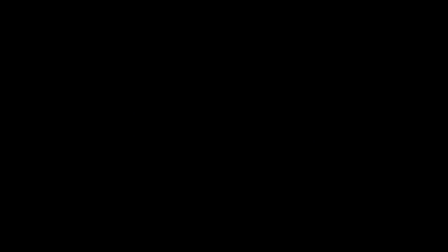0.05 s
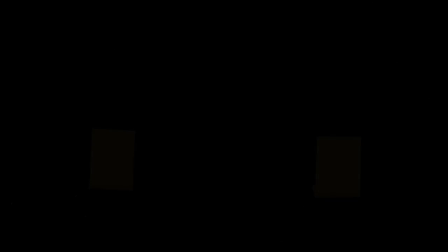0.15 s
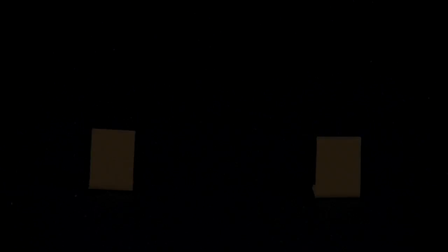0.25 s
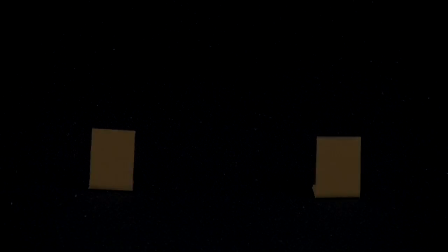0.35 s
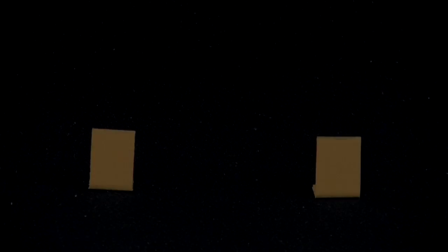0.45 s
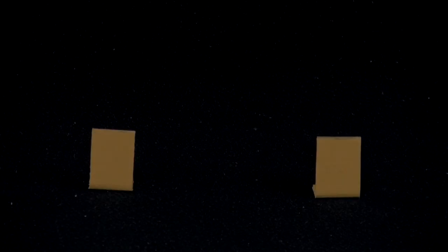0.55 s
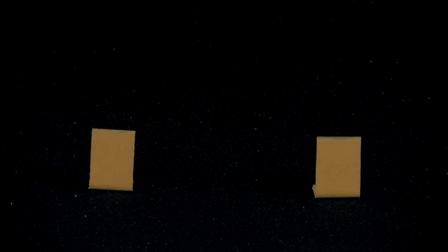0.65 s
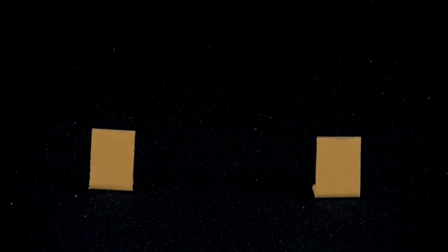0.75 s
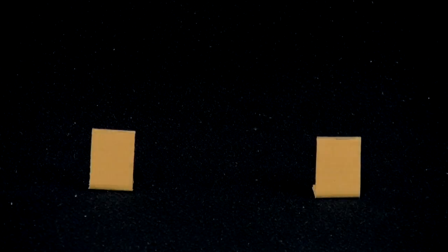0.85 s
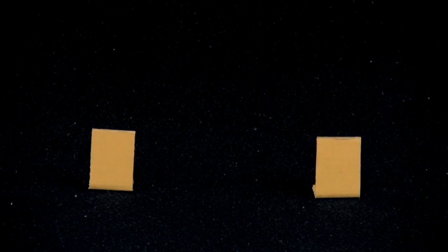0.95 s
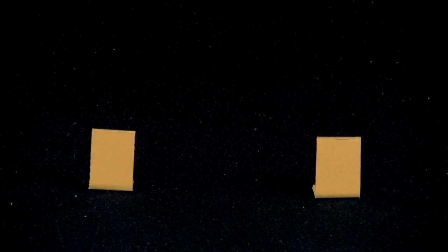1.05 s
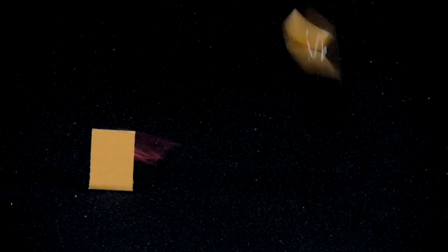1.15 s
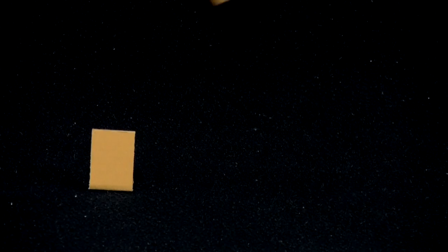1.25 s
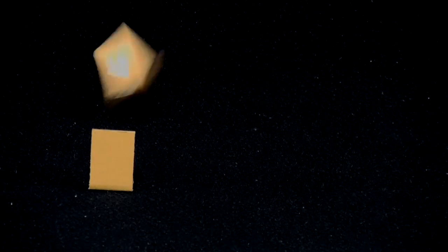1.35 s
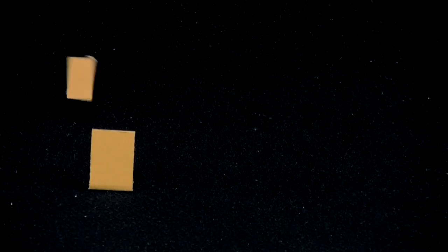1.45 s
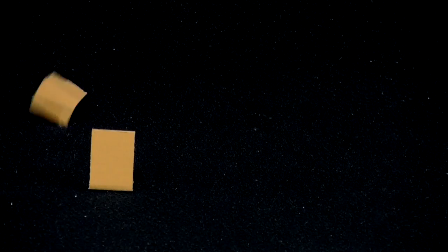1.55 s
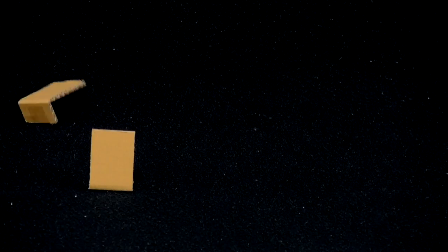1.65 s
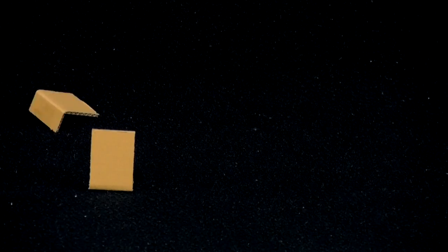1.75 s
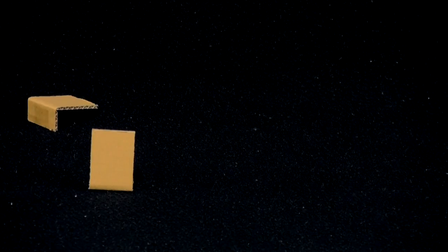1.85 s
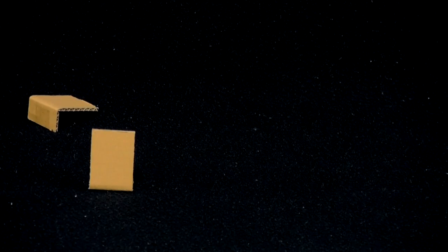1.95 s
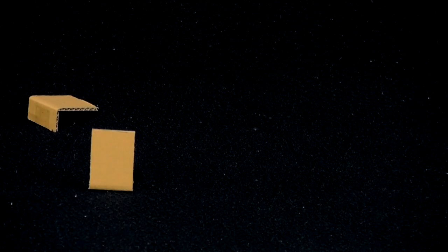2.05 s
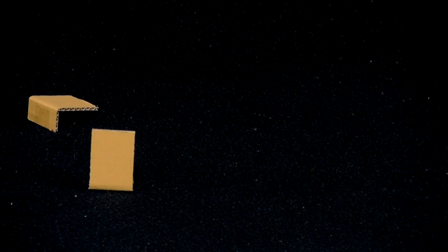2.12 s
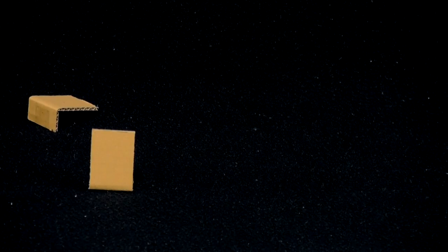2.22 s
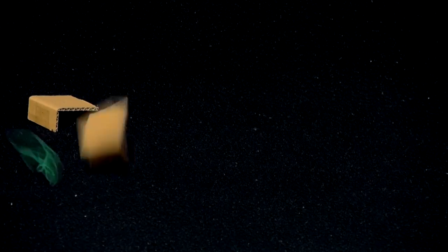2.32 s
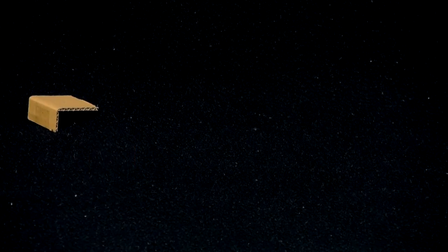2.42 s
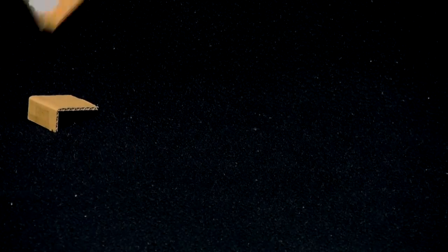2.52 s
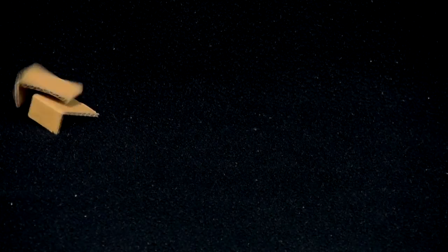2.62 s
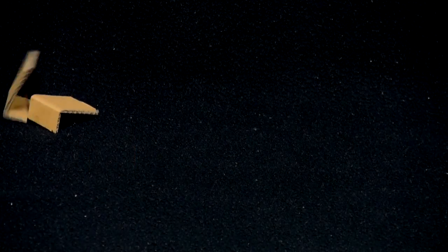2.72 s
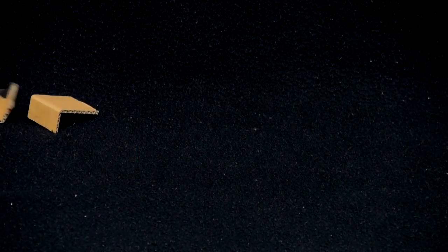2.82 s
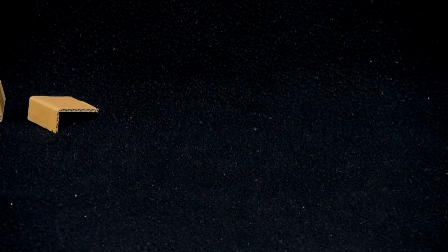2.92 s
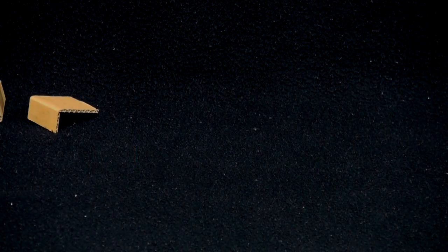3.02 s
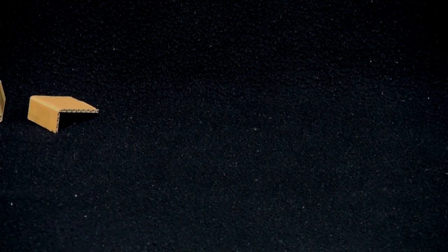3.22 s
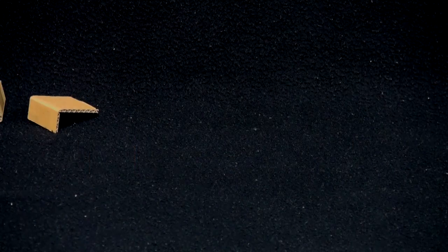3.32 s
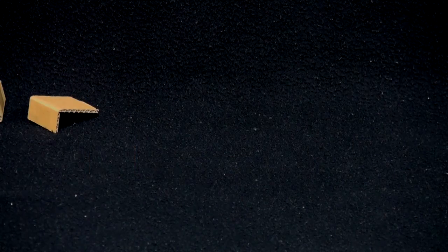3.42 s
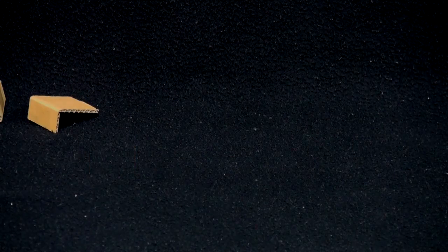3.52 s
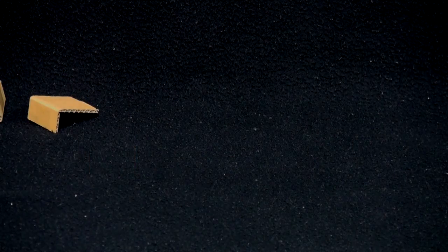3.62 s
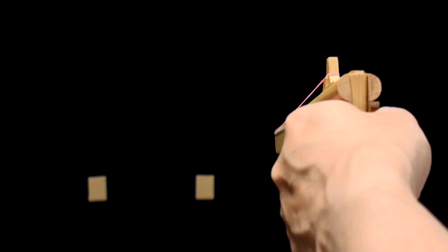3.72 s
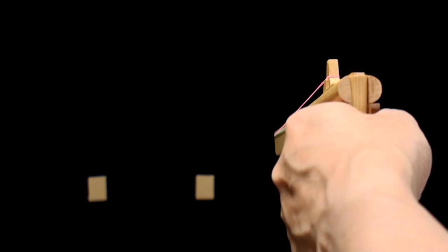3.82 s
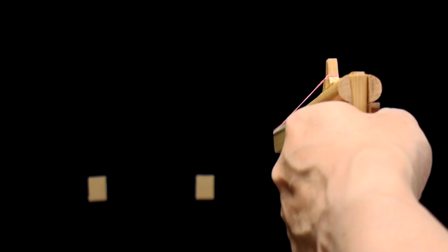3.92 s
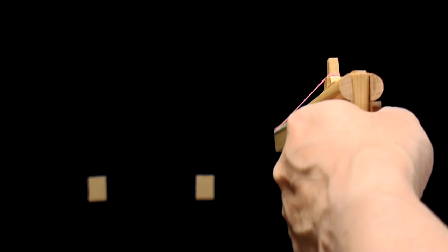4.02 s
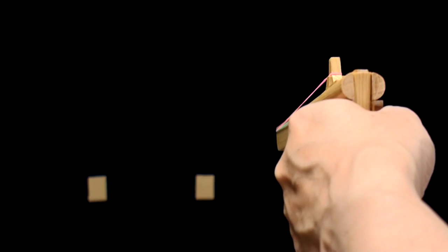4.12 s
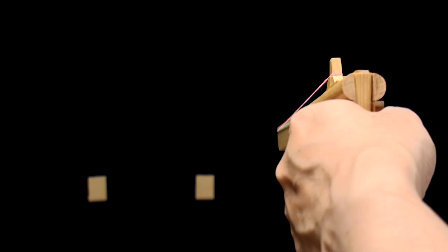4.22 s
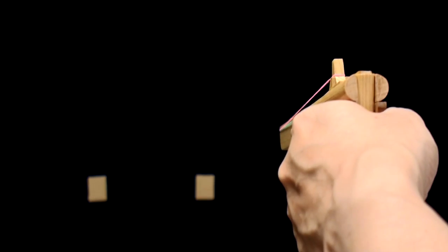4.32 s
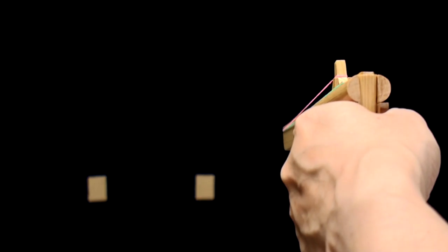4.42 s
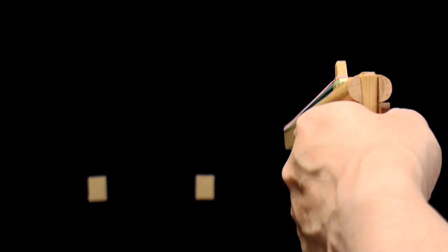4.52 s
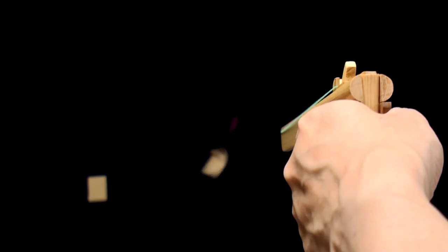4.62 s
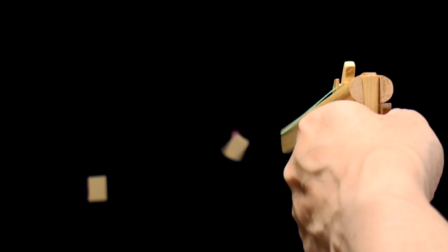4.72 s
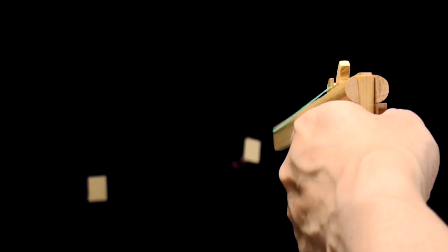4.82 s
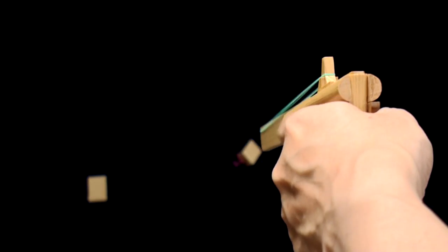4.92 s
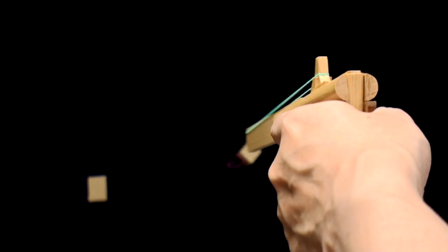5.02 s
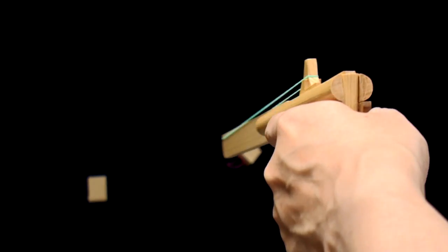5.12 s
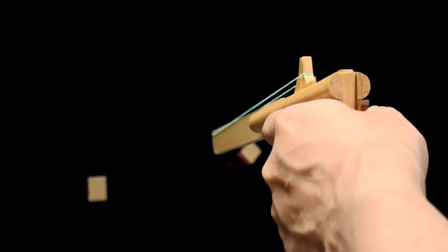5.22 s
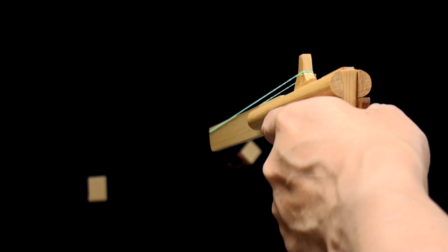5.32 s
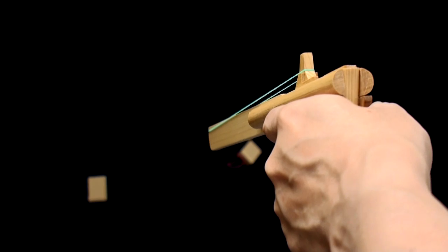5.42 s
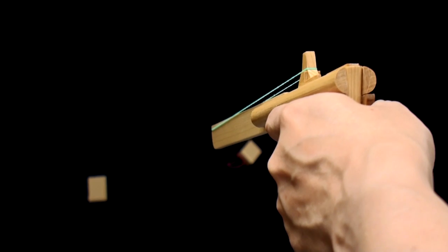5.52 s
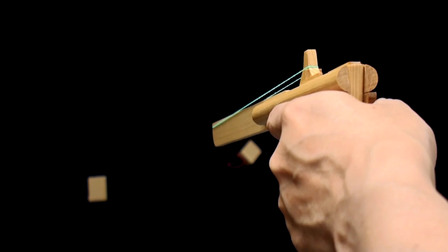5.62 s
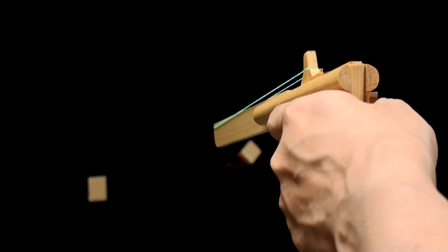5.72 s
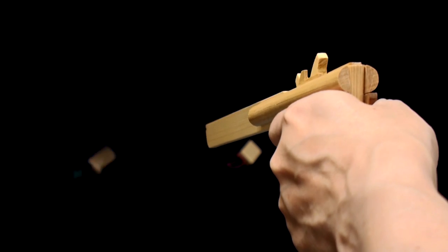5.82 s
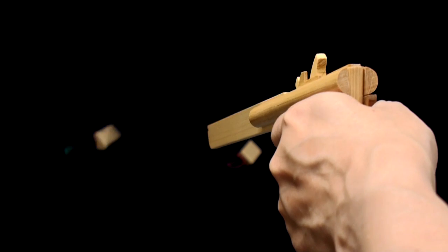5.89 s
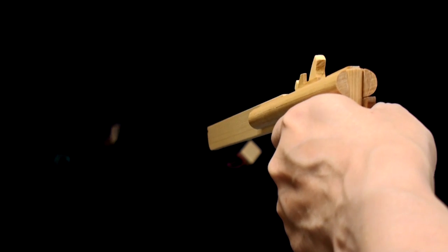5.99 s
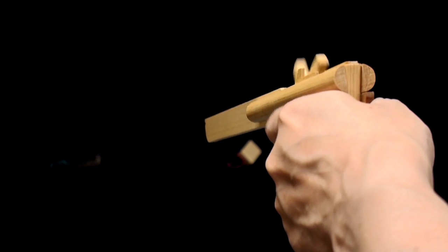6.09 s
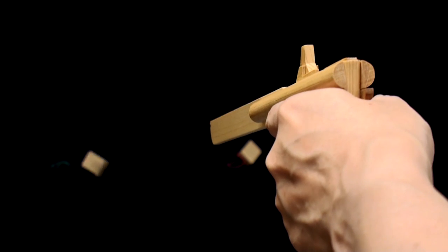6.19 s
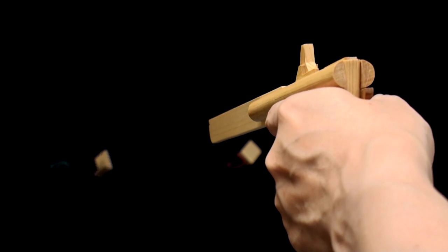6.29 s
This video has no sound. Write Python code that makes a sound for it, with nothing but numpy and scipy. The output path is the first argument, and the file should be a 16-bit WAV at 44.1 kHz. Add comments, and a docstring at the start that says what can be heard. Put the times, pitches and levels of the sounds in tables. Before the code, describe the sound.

A wooden rubber band gun fires four shots in a room with a short, lively echo, at about 1.1, 2.3, 4.6 and 5.8 seconds. Each begins with a tiny scrape and a sharp wooden click close to the microphone. The band flutters for a split second and smacks a small cardboard target farther off, so click and hit almost merge into one bright snap. Roughly a third of a second after each shot the trigger clicks back, at 1.4, 2.7, 5.0 and 6.2 seconds, with a few lighter ticks of loose parts. A knocked card tumbles onto cloth with soft, dull thuds around 1.4 seconds and again from 4.7 to 4.9. Between shots there is only faint microphone hiss, a low hum and barely audible insects chirping and trilling, lasting to the end at about 6.4 seconds.

```python
"""Rubber band target practice

A wooden rubber band gun fires four shots, alternating between two small cardboard targets in a live room.
The catch clicks close by, the band flutters off and smacks a far card, and the trigger ticks back.
After the first and third shots a card tumbles onto cloth. Each hit is a brief rough contact that rings
a body and echoes off the walls. Underneath lie a low hum, faint insects and microphone hiss."""
import sys
import numpy as np
from scipy import signal
from scipy.fft import rfft, irfft, next_fast_len
from scipy.io import wavfile
from scipy.ndimage import uniform_filter1d

SR = 44100
rng = np.random.default_rng(int(sys.argv[2]) if len(sys.argv) > 2 else 0)


def transcribe(u):
    """Save the signal u as a 16-bit wav file named by the first command-line argument.

    u: samples, shape (n,) or (channels, n), limited to [-1, 1]; the rate is SR.
    q: integer samples, one column per channel.
    """
    v = np.clip(np.atleast_2d(u).T, -1, 1)
    q = np.round(v * 32767).astype(np.int16)
    wavfile.write(sys.argv[1], SR, q)


N = 280017
RING_SAMPLES, ROOM_SAMPLES = 4096, 32768
HZ = np.maximum(np.fft.rfftfreq(RING_SAMPLES, 1 / SR), 1)
TIME = np.arange(N) / SR

# hits on alternate cards: (time [s], level [dB], body [dB], treble [dB], direct [dB], left - right [dB])
HITS = [(1.16, 2.5, 2, -4, -5.5, -1), (2.3618, -1.54, 4.5, 3, -7, -0.8), (4.6294, -0.5, 1, -5.5, -1, -0.5),
        (5.8427, -0.5, -6.5, 1, -7.5, -0.5)]
# tone of rubber on cardboard: (frequency [Hz], level [dB])
SMACK_TONE = [(120, -17), (350, 5.5), (800, 1.8), (1400, 4), (3000, 9.5), (6000, 16.5), (10000, 12),
              (14000, 7)]
# each card's resonances; the spot struck sets their strength:
# (frequency [Hz], width [Hz], lift on first hit [dB], lift on second hit [dB])
CARD_MODES = [
    [(1060, 620, 1, 11), (2447, 303, 17, 18.4), (2634, 170, 10.5, 8.8), (3050, 300, 3.5, 8.4),
     (3560, 220, 10, 1.3), (4480, 520, 7, 3.5), (5860, 280, 11, 6.8), (6760, 310, 3, 2.6),
     (8010, 290, 3, 7.8), (8450, 750, 5.5, 1.6), (11080, 1500, 2.5, 12.8), (11900, 300, 7, 2),
     (12900, 1500, 4, 10)],
    [(1320, 370, 8, 3), (1893, 350, -1.5, 10.5), (2119, 303, 20.5, 20), (2315, 256, 15, 5),
     (2624, 400, 3, 9.5), (3610, 590, 0, 8), (3950, 320, 4.5, 7.5), (5090, 270, -6, 7), (6100, 1200, 6, 7),
     (6560, 240, -6, 7), (6740, 230, 8.5, 8), (9980, 850, 10, -1.5), (11350, 300, 3, 9),
     (12260, 670, 11.5, 8.5)],
]
# early reflections of the cards: (delay [s], level [dB])
CARD_ECHOES = [(.0016, 0.5), (.0038, -3.5), (.0052, -19), (.0066, -3.5), (.0175, -1), (.027, -12)]
# bloom of their reverb: (time [s], level [dB])
CARD_SWELL = [(0, -15), (.012, -10.5), (.019, -7), (.032, -1.5), (.05, -1.5), (.07, -1), (.12, -2)]


def card_smacks(body_hz=970, body_width_hz=1700):
    """The band whips a far card; most of the sound comes by way of the walls."""
    out = np.zeros((2, N))
    for k, (s, db, body_db, treble_db, direct_db, pan_db) in enumerate(HITS):
        blow, card = divmod(k, 2)
        direct = from_db(direct_db) * first_arrivals(CARD_ECHOES, spread_s=.000012)
        room = evened(direct + diffuse_echo(CARD_SWELL), width_hz=120)
        modes = [(hz, width, lift[blow]) for hz, width, *lift in CARD_MODES[card]]
        modes.append((body_hz, body_width_hz, body_db))
        tone = at_hz(SMACK_TONE, HZ) + db + shelves(0, treble_db) + resonances(modes)
        add(out, s, pan(pan_db) * excite(contact(decay_s=0.0011), tone, room))
    return out


# tone of the wooden gun: (frequency [Hz], level [dB])
WOOD_TONE = [(100, -44), (300, -20.5), (700, -12.5), (1200, -9), (2500, -6.5), (4000, -4.5), (6500, -0.5),
             (9000, -5), (12500, -7), (15000, -25)]
# its resonances: (frequency [Hz], width [Hz], lift [dB])
GUN_MODES = [(1560, 420, 3), (2190, 180, 4.5), (3630, 130, 1.1), (5740, 200, 1)]


def wood_tone():
    """The gun's wooden body colours the clicks and the flutter: its spectrum in dB."""
    return at_hz(WOOD_TONE, HZ) + resonances(GUN_MODES)


# the catch lets go: (time [s], knock [dB], slip [dB], slip's lead [s], band flutter [dB])
RELEASES = [(1.1188, 9, 1, 0.00097, 5.5), (2.342, 7, -5, 0.0036, 3), (4.5709, 0.5, 6, 0.0002, 6),
            (5.8111, 6.5, -5, 0.0037, 0)]
# the trigger springs back: (time [s], level [dB], brightness [dB], ring [Hz], ring lift [dB])
TRIGGER_RETURNS = [(1.3576, 5.5, 2, 4550, 5.5), (2.6632, -2.5, -9, 2320, 12), (4.9684, 5, 3.5, 1820, 9),
                   (6.178, -3.5, -4, 1700, 10)]
# light ticks of band and loose parts: (time [s], level [dB], brightness [dB], ring [Hz])
LOOSE_TICKS = [(1.1434, 3.5, 0, 4500), (2.598, -10, -2, 9000), (2.6269, -4, -8, 1510),
               (4.6016, 7, 1.5, 5100), (4.8594, -6, -7, 4500), (4.953, -9, 1, 6800),
               (6.0427, -17.5, 9, 12400)]


def gun_clicks(direct, echo, slip_hz=5800, knock_hz=3200, ring_db=6.5, rebound_s=0.0045, rebound_db=-7.5):
    """The catch slips, then knocks; the trigger and loose parts strike and bounce once."""
    # colour of each contact: (bass [dB], treble [dB], reverb [dB])
    knock, slip, spring, tick = (2, -5.5, 1.8), (0.22, 5, 0), (2, -2.5, 5.5), (0, -5, 4)
    clicks = []
    for s, knock_db, slip_db, lead_s, _ in RELEASES:
        clicks.append((s - lead_s, slip_db, 0, slip_hz, ring_db, slip))
        clicks.append((s, knock_db, 0, knock_hz, ring_db, knock))
    bouncing = [(*row, spring) for row in TRIGGER_RETURNS] + [(*row, ring_db, tick) for row in LOOSE_TICKS]
    for s, db, *timbre in bouncing:
        clicks += [(s, db, *timbre), (s + rebound_s, db + rebound_db, *timbre)]
    out = np.zeros((2, N))
    for s, db, bright_db, hz, lift_db, (bass_db, treble_db, reverb_db) in clicks:
        ring = resonances([(hz, 0.26 * hz, lift_db)])
        tone = wood_tone() + db + shelves(bass_db - bright_db, treble_db + bright_db) + ring
        room = evened(direct + from_db(reverb_db) * echo, width_hz=90)
        add(out, s, excite(contact(decay_s=0.00098), tone, room))
    return out


def band_flutter(room, roughness_db=3.2):
    """The freed band flaps in a grainy rush until it meets the card."""
    out = np.zeros((2, N))
    for (s, *_, db), (hit_s, *_) in zip(RELEASES, HITS):
        noise, jitter = rng.standard_normal((2, RING_SAMPLES))
        grains = noise * from_db(roughness_db * jitter)
        flight = unit_energy(grains[:int((hit_s - s) * SR)])
        add(out, s, excite(flight, wood_tone() + db, room))
    return out


# small scrapes on the gun: (time [s], centre [Hz], width [Hz], level [dB])
SCRAPES = [(1.078, 6900, 5000, -21), (2.321, 6000, 6000, -12.5), (4.418, 7320, 1300, -12),
           (4.935, 4160, 3000, -12.5), (5.789, 5970, 6000, -15.5), (6.150, 7000, 5000, -13)]


def gun_scrapes(room):
    """The band creeps on the catch and the trigger slides back: short, bright friction."""
    out = np.zeros((2, N))
    for s, hz, width, db in SCRAPES:
        tone = db - 20 * np.log10(1 + (2 * (HZ - hz) / width) ** 2)
        add(out, s, excite(contact(decay_s=0.021), tone, room))
    return out


# early reflections of the gun: (delay [s], level [dB])
GUN_ECHOES = [(.0045, -5), (.0083, -19.5), (.0105, -8.5)]


def gun():
    """Clicks, flutter and scrapes come from one spot close by; the clicks are wettest."""
    direct = first_arrivals(GUN_ECHOES, spread_s=.00001)
    echo = diffuse_echo(swell=[(0, 2), (.006, 1.5), (.03, 0.5), (.07, -1.5)])
    echo = signal.sosfilt(signal.butter(1, 12000, fs=SR, output="sos"), echo)   # the echo is duller in the top
    return (gun_clicks(direct, echo)
            + band_flutter(direct + from_db(-4.5) * echo)
            + gun_scrapes(direct + from_db(-9) * echo))


# a card tips and lands: (time [s], level [dB])
FALLS = [(1.434, -3), (1.463, -2), (4.690, 0), (4.863, -11), (4.884, -5.5)]
# dull thud of card on cloth: (frequency [Hz], level [dB])
THUD_TONE = [(60, -16), (150, -5), (280, 0), (450, -5), (800, -16), (2000, -32), (8000, -50)]


def card_falls():
    """A knocked card tumbles softly onto cloth."""
    out = np.zeros((2, N))
    room = diffuse_echo(swell=[(0, 4), (.03, -8), (.08, -6)])
    for s, db in FALLS:
        add(out, s, excite(contact(decay_s=0.0069), at_hz(THUD_TONE, HZ) + db, room))
    return out


def first_arrivals(echoes, spread_s):
    """The direct sound, then nearby surfaces, each reaching the two ears slightly apart."""
    out = np.zeros((2, ROOM_SAMPLES))
    out[:, 0] = 1
    for s, db in echoes:
        scatter = from_db(db) * contact(decay_s=0.0002)
        for side, lag in zip(out, s + spread_s * rng.standard_normal(2)):
            i = int(abs(lag) * SR)
            side[i:i + len(scatter)] += scatter
    return unit_energy(out)


# reverb length: (frequency [Hz], time to fall 60 dB [s])
REVERB_DECAY = [(200, 0.3), (530, 0.43), (1400, 0.48), (2400, 0.41), (3700, 0.38), (6000, 0.34),
                (10000, 0.3), (15000, 0.22)]
# reverb's stereo image: (frequency [Hz], left-right correlation [0-1])
REVERB_IMAGE = [(100, 1), (600, 0.95), (1500, 0.75), (3000, 0.8), (6500, 0.88), (10000, 0.7), (15000, 0.09)]


def diffuse_echo(swell):
    """Countless reflections die away band by band, shaped by a swell of (time [s], level [dB])."""
    t, hz = np.arange(ROOM_SAMPLES) / SR, np.fft.rfftfreq(ROOM_SAMPLES, 1 / SR)
    noise = stereo_noise(REVERB_IMAGE, ROOM_SAMPLES)
    centres, t60s = np.transpose(REVERB_DECAY)
    tail = 0
    for weights, t60 in zip(np.eye(len(centres)), t60s):
        band = irfft(noise * at_hz(np.c_[centres, weights], hz))
        tail += band * from_db(-60 * t / t60)
    return unit_energy(tail * from_db(np.interp(t, *np.transpose(swell))))


def evened(room, width_hz):
    """Flatten a room's broad colour, so its reflections only smear the sound in time."""
    spectrum = rfft(room)
    power = np.mean(np.abs(spectrum) ** 2, axis=0)
    broad_power = uniform_filter1d(power, int(width_hz * ROOM_SAMPLES / SR))
    return irfft(spectrum / np.sqrt(broad_power + 1e-12))[:, :ROOM_SAMPLES - RING_SAMPLES]


# partials of the hum: (frequency [Hz], level [dB])
HUM_PARTIALS = [(75.4, -72.5), (120, -72.5), (240, -63.5), (840, -73.5), (1260, -77)]


def hum():
    """A few steady sines hum low in the centre."""
    return sum(np.sqrt(2) * from_db(db) * np.sin(2 * np.pi * (hz * TIME + rng.random()))
               for hz, db in HUM_PARTIALS)


# tone of a chirp: (frequency [Hz], density [dB per Hz])
CHIRP_TONE = [(3450, -112), (3640, -99), (3780, -81.5), (3880, -97), (3970, -97), (4100, -115)]
# runs of chirps with a short hitch between: (first chirp [s], last chirp [s])
CHIRP_PHRASES = [(0.25, 3.63), (3.92, 6.33)]


def chirping_insect(period_s=0.2, half_width_s=0.063):
    """A far insect keeps an even beat; the room blurs its wing strokes into a narrow band."""
    coarse_time, pulses = TIME[::100], 0
    for first, last in CHIRP_PHRASES:
        for s in np.linspace(first, last, round((last - first) / period_s) + 1):
            pulses += np.exp(-((coarse_time - s) / half_width_s) ** 2)
    return np.interp(TIME, coarse_time, pulses) * noise_bed(CHIRP_TONE, image=[(3800, .8)])


# tone of the trill: (frequency [Hz], density [dB per Hz])
TRILL_TONE = [(4900, -112), (5200, -94), (5420, -84), (5620, -83), (5770, -85), (5900, -99), (6100, -115)]


def trilling_cricket(wing_hz=57, wing_depth=0.097, left_db=2.5, left_lag_s=0.0002):
    """Wing strokes ripple a steady high band, louder and later on the left."""
    strokes = 1 + wing_depth * np.sin(2 * np.pi * wing_hz * TIME)
    left, right = strokes * noise_bed(TRILL_TONE, image=[(5600, 0.99)])
    return np.array([from_db(left_db) * np.interp(TIME - left_lag_s, TIME, left), right])


# tone of the hiss: (frequency [Hz], density [dB per Hz])
HISS_TONE = [(20, -98), (45, -86.5), (80, -89.5), (170, -86.5), (350, -87.5), (800, -88), (1500, -91.5),
             (2500, -95.5), (4500, -100), (7000, -103), (10000, -105), (12500, -104), (13200, -125),
             (14000, -145)]
# its stereo image: (frequency [Hz], left-right correlation [0-1])
HISS_IMAGE = [(60, 0.99), (130, 0.94), (290, 0.57), (640, 0.2), (1400, 0.013), (7000, 0.069),
              (15000, 0.093)]


def hiss():
    """Microphone noise, centred in the bass and wide in the treble."""
    return noise_bed(HISS_TONE, HISS_IMAGE)


def contact(decay_s):
    """The force of a brief rough contact: a noise burst with its spectrum flattened."""
    envelope = np.exp(-np.arange(RING_SAMPLES) / SR / decay_s)
    burst = rfft(rng.standard_normal(RING_SAMPLES) * envelope)
    return irfft(burst / (np.abs(burst) + 1e-12))[:RING_SAMPLES // 2]


def excite(force, tone_db, room):
    """A force rings a body (the minimum-phase response of its tone), which sounds into the room."""
    cepstrum = irfft(np.log(from_db(tone_db)))[:RING_SAMPLES // 2]
    cepstrum[0] /= 2
    ring = irfft(np.exp(rfft(2 * cepstrum, RING_SAMPLES)))
    return signal.fftconvolve(signal.fftconvolve(force, ring)[None], room, axes=1)


def resonances(modes):
    """The dB that resonant peaks add to a tone."""
    return sum(db / (1 + (1.6 * (HZ - hz) / width) ** 2) ** 2 for hz, width, db in modes)


def shelves(bass_db, treble_db):
    """The dB that a duller or sharper contact adds to a tone."""
    bass = bass_db * at_hz([(1600, 0.99), (4000, 0.14)], HZ)
    return bass + treble_db * at_hz([(6000, 0.2), (11000, 0.94)], HZ)


def noise_bed(tone, image):
    """Steady stereo noise with a tone in dB per Hz, silent above its last point."""
    size = next_fast_len(N, True)
    hz = np.fft.rfftfreq(size, 1 / SR)
    gain = from_db(at_hz(tone, hz)) * np.sqrt(SR / 2) * (hz < tone[-1][0])
    return irfft(stereo_noise(image, size) * gain, size)[:, :N]


def stereo_noise(image, size):
    """Spectra of two white noises, correlated as the image says."""
    alike = np.clip(at_hz(image, np.fft.rfftfreq(size, 1 / SR)), -.999, .999)
    mid, side = rfft(rng.standard_normal((2, size)))
    return np.sqrt((1 + alike) / 2) * mid + np.sqrt((1 - alike) / 2) * side * [[1], [-1]]


def from_db(db):
    """Decibels to gain."""
    return 10 ** (np.asarray(db) / 20)


def pan(db):
    """Two channel gains, with the left this many dB above the right."""
    return from_db(db / 2 * np.array([[1], [-1]]))


def at_hz(points, hz):
    """Read a table on a log-frequency axis."""
    f, value = np.transpose(points)
    return np.interp(np.log(np.maximum(hz, 1)), np.log(f), value)


def add(out, s, sound):
    """Mix a sound in at a time."""
    i = int(round(s * SR))
    out[:, i:i + sound.shape[-1]] += sound[..., :N - i]


def unit_energy(x):
    """Scale to a mean energy of 1 per channel."""
    return x / np.sqrt(np.mean(np.sum(x ** 2, axis=-1)))


def scene():
    """Four shots over the quiet room."""
    return card_smacks() + gun() + card_falls() + hum() + chirping_insect() + trilling_cricket() + hiss()


def record(dry, start_s=0.15, fade_s=0.0049, cutoff_hz=15100):
    """Each microphone adds a slight colour, the sound fades in quickly and the top is cut."""
    size = next_fast_len(N, True)
    # (frequency [Hz], left - right [dB])
    lean = [(300, 0.15), (1100, -0.12), (2300, 0.025), (5500, 0.21), (9000, 0.072), (13000, 2.2)]
    balance = pan(at_hz(lean, np.fft.rfftfreq(size, 1 / SR)))
    coloured = irfft(rfft(dry, size) * balance, size)[:, :N]
    faded_in = coloured * np.clip((TIME - start_s) / fade_s, 0, 1)
    return signal.sosfilt(signal.ellip(10, .1, 80, cutoff_hz, fs=SR, output="sos"), faded_in)


dry = scene()
out = record(dry)
transcribe(out)
```